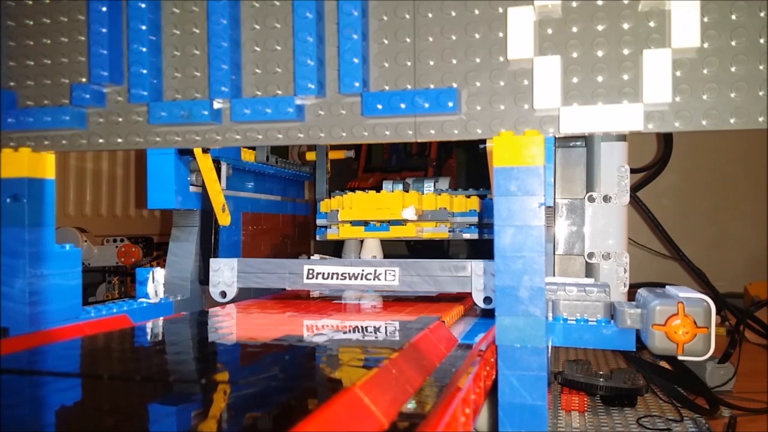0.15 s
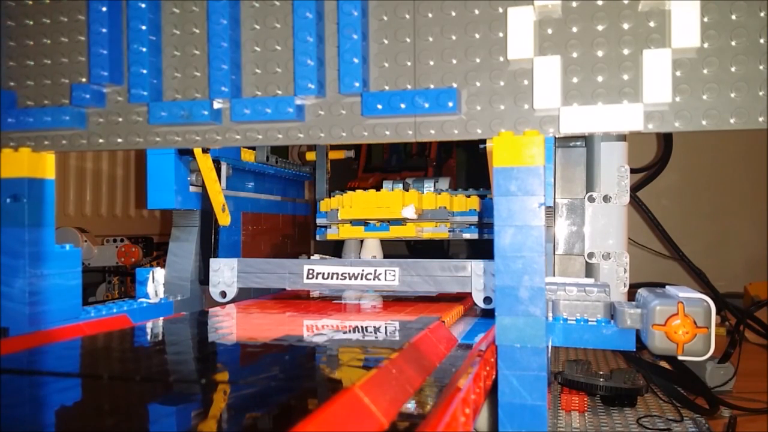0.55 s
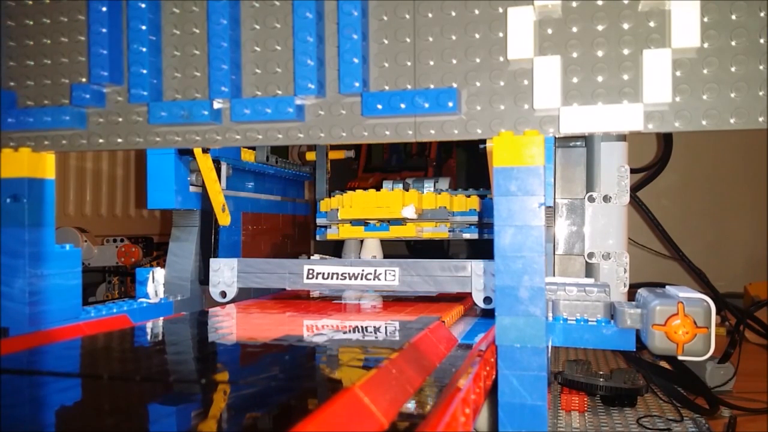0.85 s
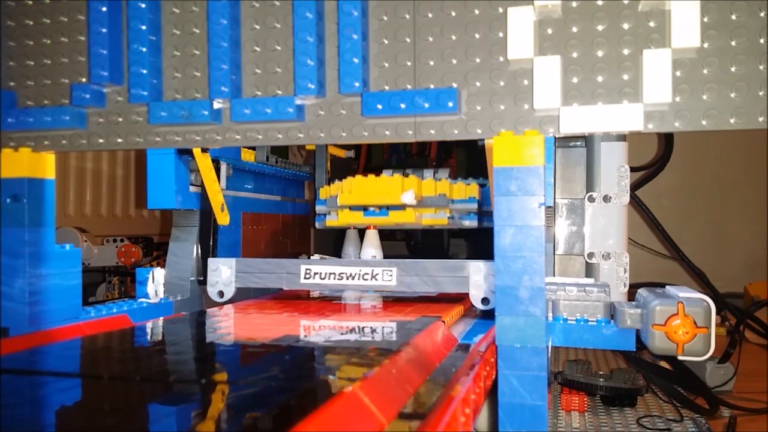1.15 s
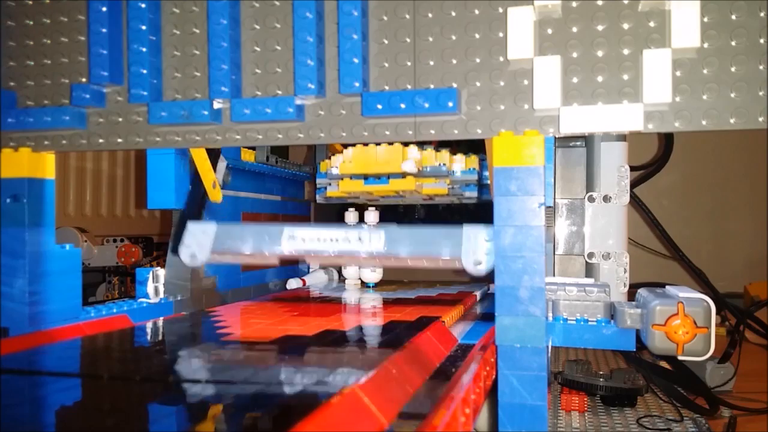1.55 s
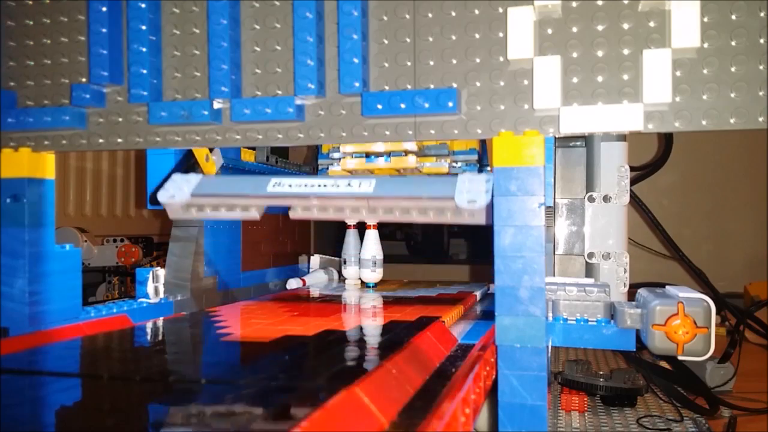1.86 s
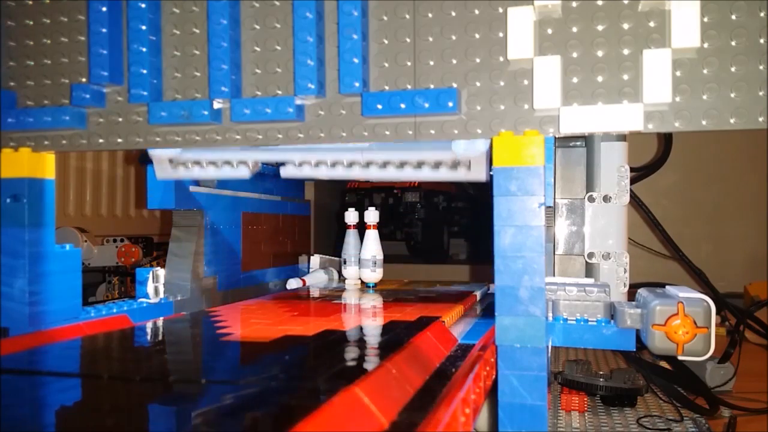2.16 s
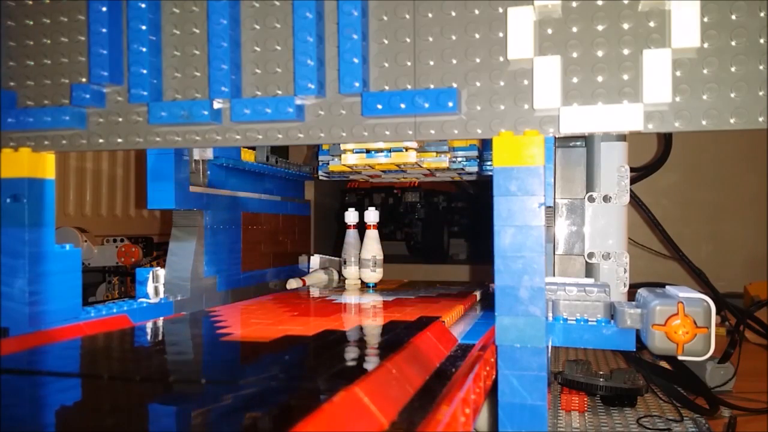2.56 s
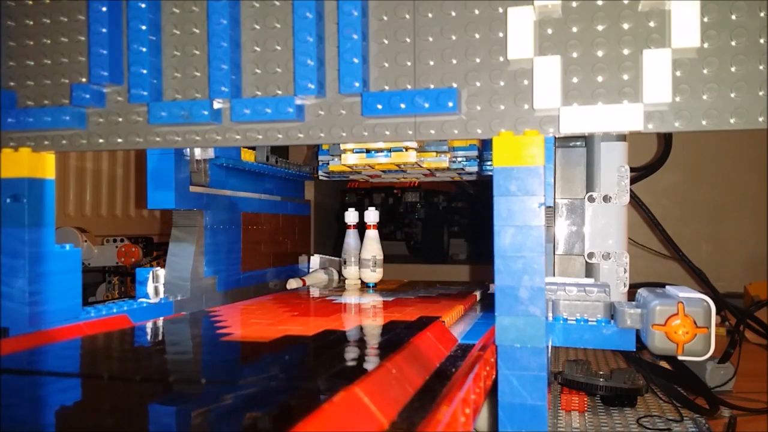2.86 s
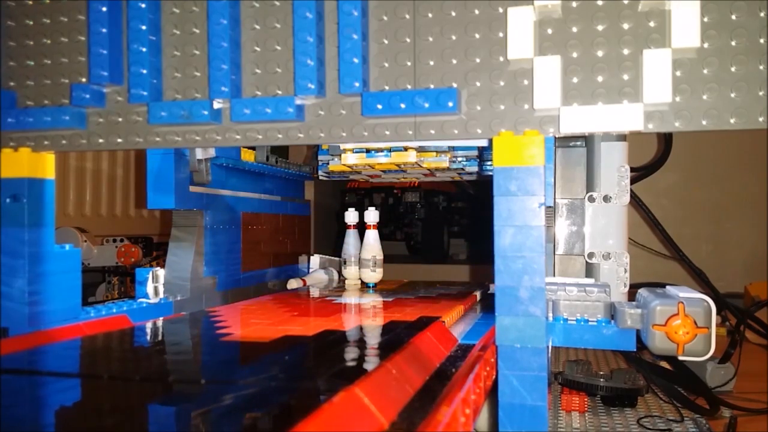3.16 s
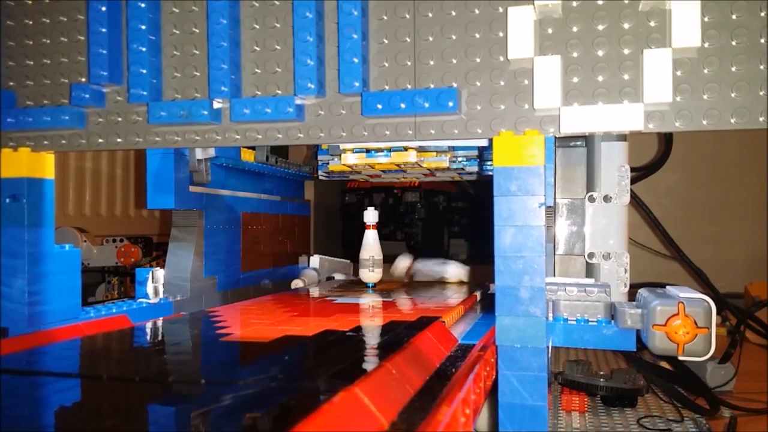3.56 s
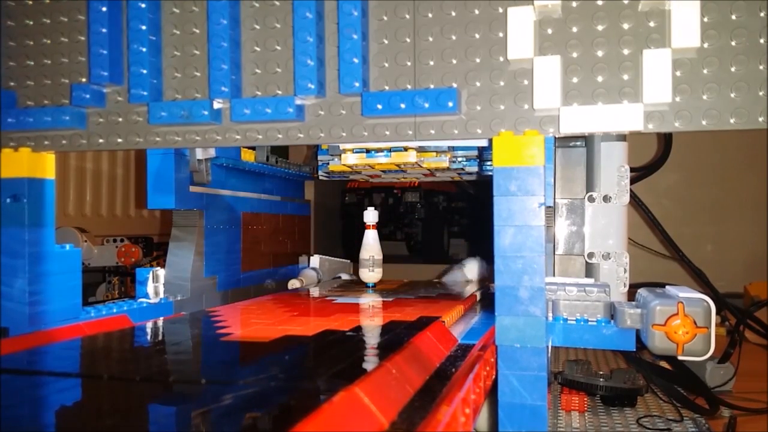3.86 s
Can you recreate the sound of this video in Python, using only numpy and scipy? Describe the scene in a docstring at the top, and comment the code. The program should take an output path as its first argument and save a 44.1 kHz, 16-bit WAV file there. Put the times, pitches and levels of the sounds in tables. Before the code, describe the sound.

In a toy brick bowling alley, a ball clunks and rumbles along a plastic track. A small geared motor whines and stops, then a ball rattles down the lane and scatters plastic pins, heard close in a quiet room.

```python
"""A ball clunks onto the return track of a toy brick bowling alley and rumbles along it, heard from the lane.
A small geared motor whines, lifts the sweep bar and runs down. A ball is launched, hops past on the left,
scatters the pins and drops into the hollow pit. Each blow rings the plastic parts, the frame, the hollow
beneath and the room. Far below: two squeaks at the start, a thin whistle, room hush."""
import sys
import numpy as np
from scipy import signal
from scipy.fft import rfft, irfft
from scipy.io import wavfile

SR = 44100
rng = np.random.default_rng(int(sys.argv[2]) if len(sys.argv) > 2 else 0)


def to_wav(s):
    """Save 16-bit WAV."""
    ch = np.atleast_2d(s).T  # columns
    pcm = np.round(np.clip(ch, -1, 1) * 32767)  # PCM
    wavfile.write(sys.argv[1], SR, pcm.astype(np.int16))


N = 176400
T = np.arange(N) / SR
BIN_HZ = np.fft.rfftfreq(N, 1 / SR)

# Blows, levels relative: start_s, thud_db, clack_db, tick_db, tail_db
TRACK_KNOCKS = [(0.4042, -27, -24, -31.5, -7.5), (0.4169, -28.5, -26, -47, -5),
                (0.4435, -25.5, -29.5, -41.5, -7), (0.482, -33.5, -31.5, -57, -6),
                (0.6694, -28, -35, -51, 0), (0.8753, -31, -35.5, -47, -14.5), (0.9524, -34, -58, -71, -2),
                (1.1819, -22, -61, -47, -4), (1.3042, -29, -29.5, -49, -8.5)]
LANE_HOPS = [(2.9271, -21, -22.5, -28, -3), (2.9796, -38, -32.5, -46, 4), (2.9958, -14.5, -25, -27.5, -7),
             (3.0455, -22.5, -26.5, -45, -0.5), (3.1377, -19.5, -24.5, -32, -11),
             (3.1769, -18.5, -19.5, -32.5, -13.5), (3.2091, -25, -19, -33.5, -14),
             (3.2304, -19, -18.5, -37, -6), (3.2544, -20.5, -22.5, -33.5, -31),
             (3.2786, -21, -21.5, -37, -31), (3.3085, -26.5, -17.5, -29.5, -6.5),
             (3.3283, -37, -20, -36, -28), (3.336, -17.5, -29, -22.5, -29), (3.3639, -16, -30, -21.5, -8.5),
             (3.3882, -24.5, -15.5, -28.5, -18), (3.4131, -18.5, -22.5, -38, -20),
             (3.4348, -28, -23, -31, -1.5), (3.4493, -18, -45, -44, -26), (3.4756, -15.5, -22.5, -31.5, -9),
             (3.5161, -21, -18.5, -25.5, -7)]
PIN_HITS = [(3.539, -21, -25, -23.5, -10), (3.5878, -31, -23, -25, -9), (3.5948, -24, -21, -16.5, -4.5),
            (3.6329, -44, -39, -20.5, -8.5), (3.6646, -37, -29, -23.5, -5), (3.6778, -15, -22.5, -20, -6.5),
            (3.7211, -25, -39, -26, -15), (3.7708, -59, -25.5, -21.5, -7.5), (3.7985, -12.5, -20, -28, -8),
            (3.8866, -36.5, -26, -26, 1), (3.9441, -18, -14.5, -26, -2.5)]
# Where blows land: time_s, left_lead_ms, left_over_right_db, hollow_hz
BLOW_PLACES = [(.4, 0.28, 0, 340), (1.3, 0.12, 1.5, 495), (2.93, 0.31, 1, 609), (3.2, 0.25, 6.5, 608),
               (3.32, 0.33, 2.5, 462), (3.48, .14, 2, 420), (3.65, 0.02, -1, 377), (3.82, -0.22, -1.5, 443)]
# Brick frame modes: pitch_hz, level_db, t60_s
FRAME_MODES = [(403, -3, 0.1), (484, -6, 0.099), (657, -4.5, 0.096), (990, -21, 0.0039), (1830, 4, 0.068),
               (5200, -18, .035)]
# Ringing lengths of track: pitch_hz (at TRACK_MID_S), level_db, loudest_s
TRACK_MODES = [(237, -8.5, 0.68), (309, -2, 0.71), (409.5, -0.5, 0.845), (501.2, 3.5, 0.78), (584, 2, 0.87),
               (655, -2, 0.99), (910, -2, 0.88), (467, 1.5, 1.35)]
# Motor speed: time_s, speed_hz
MOTOR_SPEED = [(1.04, 400), (1.15, 528), (1.22, 554), (1.29, 551), (1.376, 540), (1.562, 574), (1.66, 586),
               (1.77, 586), (1.962, 567), (1.995, 486), (2.06, 468), (2.2, 383)]
# Motor partials: speed_multiple, level_db
WHINE_PARTIALS = [(1, -41.5), (2, -44.5), (3, -40), (4, -43), (5, -45), (6, -49.5), (11, -49.5)]
# Gear fizz balance: freq_hz, left_over_right_db
GEAR_BALANCE = [(300, -0.5), (700, -10), (4400, 0), (7000, 6.5), (9500, -17), (14000, 0)]
# Ball on the lane: time_s, rattle_db, rumble_db
ROLL_LEVELS = [(2.925, -64, -60), (2.95, -27, -39), (3.11, -30, -40.5), (3.24, -32.5, -33),
               (3.37, -27.5, -40), (3.65, -25.5, -52), (3.78, -32, -52.5), (4, -52, -65)]
# Drops into the pit: start_s, hold_s, level_db
PIT_DROPS = [(3.805, 0.054, -20), (3.954, .05, -21)]
# Squeaks: start_s, pitch_hz, level_db
FAINT_SQUEAKS = [(.04, 9400, -63), (.08, 10000, -63)]
# Room decay: freq_hz, t60_s
ROOM_DECAY = [(100, 0.53), (500, 0.33), (2000, 0.52), (6000, 0.37), (15000, 0.35)]
# Left-right likeness: freq_hz, coherence
ROOM_COHERENCE = [(100, 0.73), (500, 0.78), (1200, 0.3), (3000, 0.099)]

# Envelopes, relative: time_s, level_db
RETURN_LEVEL = [(.41, -32), (.6, -29), (.7, -32.5), (.88, -28), (1.0, -31), (1.09, -26), (1.23, -31.5),
                (1.32, -37), (1.47, -76)]
MOTOR_LEVEL = [(1.03, -39), (1.14, -3.5), (1.25, -1), (1.45, -2), (1.7, 0), (1.97, 0.5), (2.04, -3.5),
               (2.12, -14), (2.28, -58)]
SKITTER_LEVEL = [(3.52, -30), (3.57, -31), (3.66, -38), (3.73, -24.5), (3.79, -33), (3.87, -39), (4, -47)]
STIR_LEVEL = [(2.2, -71), (2.49, -62), (2.58, -59), (2.66, -51.5), (2.71, -66), (2.9, -69)]

# Spectral shapes: freq_hz, gain_db
KNOCK_SPECTRUM = [(35, -80), (60, -18.5), (272, -16), (312, -7), (572, 0), (657, -6), (1520, -4),
                  (2530, -17.5), (14100, -41), (15500, -68)]
HOP_SPECTRUM = [(35, -46), (60, -27), (87, -24), (248, -17), (464, -1.5), (533, -0.5), (953, -4),
                (1290, -10.5), (2840, -17), (8090, -31), (9080, -30), (14100, -39), (15500, -48)]
PIN_SPECTRUM = [(35, -45), (60, -54), (266, -9.5), (433, 3), (810, -3), (1020, -5.5), (1150, -10.5),
                (1910, -6), (7720, -18), (8870, -14.5), (11500, -26.5), (14100, -21.5), (15500, -54)]
RETURN_SPECTRUM = [(29, -65), (50, -15), (200, -17), (292, -5.5), (371, -3), (399, -20), (570, -2),
                   (613, -3.5), (941, -3), (1200, -13.5), (1380, -10.5), (1970, -23), (8260, -37.5),
                   (15000, -49)]
GEAR_SPECTRUM = [(120, -6), (400, -12.5), (900, -16), (1500, -3.5), (2000, -12), (2600, -3.5), (4200, -5),
                 (5000, -8.5), (6300, -5.5), (7400, -8), (9700, -3), (10600, -8), (13000, -10),
                 (14500, -33)]
RATTLE_SPECTRUM = [(100, -31), (250, -11), (400, 5), (600, -10.5), (1000, -3), (2000, -15), (4000, -27),
                   (8000, -26.5), (15000, -42)]
RUMBLE_SPECTRUM = [(25, -17), (55, -30), (85, -0.5), (150, -3.5), (230, -7), (400, -18), (1500, -70)]
PIT_SPECTRUM = [(250, -30), (430, 9), (750, 0), (1300, 2.5), (2600, -0.5), (3500, -10), (7000, -11.5),
                (15000, -37)]
HUSH_SPECTRUM = [(20, -7.5), (44, -4), (60, -15), (97, 2.5), (125, -5.5), (220, -11.5), (400, -18),
                 (700, -24), (1080, -18.5), (1600, -22.5), (6000, -27), (9000, -24.5), (15000, -35)]
SKITTER_SPECTRUM = [(200, -23), (450, -36), (2500, 7.5), (5000, 7), (9000, 3), (15000, -1.5)]
STIR_SPECTRUM = [(100, -26), (280, -14.5), (385, 6), (520, -10.5), (1200, -8.5), (3000, -24), (12000, -54)]

THUD_TOP_HZ, TICK_FOOT_HZ = 900, 4500
PART_RANGE_HZ, PART_T60_S, PART_DB = (1745, 10290), 0.038, -26
PUSH_DB, HOLLOW_T60_S = -9, 0.055
TRACK_RISE_PER_S, TRACK_MID_S = 0.16, 0.893
CASE_HZ, CASE_WIDTH_HZ, CASE_DB = 1532, 230, -1.5


def track_knocks():
    """Return track and lifting gear knock."""
    return blows(TRACK_KNOCKS, KNOCK_SPECTRUM, crack_s=0.002, crack_db=-19.5, scatter_s=0.013,
                 scatter_db=-24.5, ring_db=7, hollow_db=-33, swell_s=0.0037, room_db=3.5, gain_db=-1.5)


def ball_hops():
    """The ball bounces down the lane."""
    return blows(LANE_HOPS, HOP_SPECTRUM, crack_s=0.0033, crack_db=-19, scatter_s=0.0049,
                 scatter_db=-16.5, ring_db=5, hollow_db=-32.5, swell_s=0.011, room_db=1, gain_db=-1.1)


def pin_strikes():
    """Ball and pins collide and fall."""
    return blows(PIN_HITS, PIN_SPECTRUM, crack_s=0.0029, crack_db=-11, scatter_s=0.0064,
                 scatter_db=-26, ring_db=8, hollow_db=-36.5, swell_s=0.012, room_db=2, gain_db=-1.03)


def blows(rows, spectrum, crack_s, crack_db, scatter_s, scatter_db, ring_db, hollow_db,
          swell_s, room_db, gain_db, size=24576):
    """Each blow: push, crack, scatter among the bricks; frame, part, hollow and room ring on."""
    t, hz = np.arange(size) / SR, np.fft.rfftfreq(size, 1 / SR)
    low = 1 / (1 + (hz / THUD_TOP_HZ) ** 6)
    high = 1 - 1 / (1 + (hz / TICK_FOOT_HZ) ** 6)
    bands = np.array([low, 1 - low - high, high])
    shape = amp(at_hz(spectrum, hz))
    frame = sum(amp(db - 60 * t / t60_s) * np.sin(2 * np.pi * f * t) for f, db, t60_s in FRAME_MODES)
    frame /= abs(rfft(frame)).max()
    burst = amp(crack_db) * np.exp(-t / crack_s) + amp(scatter_db) * np.exp(-t / scatter_s)
    attack = SR // 100
    place_s, *place_columns = np.transpose(BLOW_PLACES)
    out = np.zeros((2, N))
    for start_s, thud_db, clack_db, tick_db, tail_db in rows:
        lead_ms, side_db, hollow_hz = (np.interp(start_s, place_s, column) for column in place_columns)
        near, far = cohere(noise(size)), cohere(noise(size))
        part_hz = np.exp(rng.uniform(*np.log(PART_RANGE_HZ), (6, 1)))
        part = amp(PART_DB - 60 * t / PART_T60_S) * np.sin(2 * np.pi * part_hz * t).sum(0)
        direct = amp(PUSH_DB) * (t == 0) + near * burst + amp(ring_db) * frame + part
        direct_rms = np.sqrt(np.mean(direct[:, :attack] ** 2))
        tail = room_decay(far) * (1 - np.exp(-t / swell_s)) * amp(tail_db + room_db) * direct_rms
        hollow = amp(hollow_db - 60 * t / HOLLOW_T60_S) * np.sin(2 * np.pi * hollow_hz * t)
        blow = rfft(direct + hollow + tail)
        # Thud, clack and tick set the three bands over the first 10 ms.
        band_attacks = irfft(bands[:, None] * blow * min_phase(shape))[..., :attack]
        band_gains = amp([thud_db, clack_db, tick_db]) / np.sqrt((band_attacks ** 2).mean((1, 2)))
        left, right = irfft(blow * min_phase(shape * (band_gains @ bands))) * pan(side_db)
        lead = round(lead_ms * SR / 1000)
        padding = (max(-lead, 0), max(lead, 0))
        add(out, start_s, np.array([np.pad(left, padding), np.pad(right, padding[::-1])]))
    return amp(gain_db) * out


def ball_return(width_hz=16.2, pass_s=0.17):
    """The ball ticks over brick seams; lengths of track hum in turn, rising as it gathers speed."""
    seams = cohere(grains(per_s=1100, spread_db=0.5, length_s=0.0037), lead_ms=0.18)
    climb = np.exp(TRACK_RISE_PER_S * (T - TRACK_MID_S))
    hum = np.zeros((2, N))
    for hz, db, loudest_s in TRACK_MODES:
        ring = resonate(resonate(seams, hz * climb, width_hz), hz * climb, 4 * width_hz)
        hum += amp(db) * unit_rms(ring) / (1 + ((T - loudest_s) / pass_s) ** 2)
    ticks = colour(seams, RETURN_SPECTRUM)
    return envelope(RETURN_LEVEL) * (amp(-3.5) * ticks + amp(-7.5) * hum) * pan(db=1.3)


def motor(flutter_depth=0.009, power_cut_s=1.97, fade_s=0.025, echo_size=16384):
    """A rough, fluttering geared whine rings in case and room, and dies once the power is cut."""
    speed_hz = np.interp(T, *np.transpose(MOTOR_SPEED))
    turns = np.cumsum(speed_hz * (1 + flutter_depth * wander(hz=80)[0])) / SR
    whine, mesh = np.zeros((2, N)), np.zeros((2, N))
    for multiple, db in WHINE_PARTIALS:
        phase = 2 * np.pi * multiple * (turns + rng.random()) + 0.15 * wander(hz=50)
        whine += amp(db) * np.sqrt(2) * np.cos(phase) * (1 + 0.18 * wander(hz=70))
    for multiple in range(7, 23):
        phase = 2 * np.pi * multiple * turns + 1.9 * wander(hz=24.8)
        mesh += amp(at_hz(GEAR_SPECTRUM, multiple * speed_hz.max())) * np.cos(phase)
    drive = envelope(MOTOR_LEVEL)
    fade = np.exp(-np.maximum(T - power_cut_s, 0) / fade_s)
    # The gearbox case rings as a partial slides through its pitch.
    case_hz = np.full(N, CASE_HZ)
    case = resonate(resonate(whine, case_hz, CASE_WIDTH_HZ), case_hz, 2 * CASE_WIDTH_HZ)
    tones = drive * (fade * (whine + amp(-36) * unit_rms(mesh)) + amp(CASE_DB) * case)
    room_response = unit_rms(room_decay(cohere(noise(echo_size)))) / np.sqrt(echo_size)
    echo = signal.fftconvolve(tones, room_response, axes=1)[:, :N]
    fizz = drive * gear_fizz(speed_hz, turns)
    return (amp(-4) * tones + amp(-5) * echo) * pan(db=-4) + amp(-33) * fizz


def gear_fizz(speed_hz, motor_turns, wheel_top_hz=55):
    """Gear teeth fizz, swelling once per turn of a wheel and of the motor."""
    wheel_turns = np.cumsum(wheel_top_hz * speed_hz / speed_hz.max()) / SR
    swell = (1 + 0.063 * np.cos(2 * np.pi * wheel_turns)) * (1 + 0.15 * np.cos(2 * np.pi * motor_turns))
    teeth = colour(grains(per_s=3300, spread_db=0.5, length_s=0.005) * swell, GEAR_SPECTRUM)
    side_db = at_hz(GEAR_BALANCE, BIN_HZ)
    return unit_rms(irfft(rfft(teeth) * amp(np.array([side_db, -side_db]) / 2), N))


def ball_roll():
    """The ball rattles and rumbles along the lane."""
    ticks = cohere(grains(per_s=150, spread_db=3, length_s=0.0025), lead_ms=0.086)
    rattle = colour(ticks, RATTLE_SPECTRUM) * pan(db=-1)
    rumble = colour(noise(N), RUMBLE_SPECTRUM) * pan(db=9)
    return envelope(ROLL_LEVELS) * rattle + envelope(ROLL_LEVELS, column=2) * rumble


def pin_skitter():
    """Fallen pins skitter."""
    ticks = cohere(grains(per_s=350, spread_db=7, length_s=0.0037))
    return envelope(SKITTER_LEVEL) * colour(ticks, SKITTER_SPECTRUM)


def pit_chatter(rise_s=0.0027, fall_s=0.041):
    """Loose bricks of the pit floor chatter after each drop."""
    swell = np.zeros(N)
    for start_s, hold_s, db in PIT_DROPS:
        age_s = T - start_s
        swell += amp(db) * np.clip(age_s / rise_s, 0, 1) * np.exp(-np.maximum(age_s - hold_s, 0) / fall_s)
    bricks = cohere(grains(per_s=560, spread_db=-1.5, length_s=0.0066))
    return swell * colour(bricks, PIT_SPECTRUM) * pan(db=-1.5)


def quiet_room():
    """Steady hush with a low hum; the frame stirs faintly."""
    hush = amp(-59.5) * colour(cohere(noise(N)), HUSH_SPECTRUM)
    stir = colour(cohere(grains(per_s=360, spread_db=-5, length_s=0.011)), STIR_SPECTRUM)
    return hush + envelope(STIR_LEVEL) * stir


def whistle_and_squeaks(whistle_hz=8064, squeak_s=0.078, sag_hz_per_s=2000):
    """A thin whistle comes and goes; two faint squeaks sag in pitch."""
    out = amp(-84) * np.sqrt(2) * np.sin(2 * np.pi * whistle_hz * T) * np.maximum(0.5 + wander(hz=2.2), 0)
    t = np.arange(0, squeak_s, 1 / SR)
    for start_s, hz, db in FAINT_SQUEAKS:
        phase = 2 * np.pi * np.cumsum(hz - sag_hz_per_s * t) / SR + wander(hz=80)[:, :len(t)]
        add(out, start_s, amp(db) * np.sin(np.pi * t / squeak_s) * np.sin(phase))
    return out


def room_decay(x):
    """Room tail: each band dies at its own rate."""
    hz, time_s, bins = signal.stft(x, SR, nperseg=256)
    decay = amp(-60 * time_s / at_hz(ROOM_DECAY, hz)[:, None])
    return signal.istft(bins * decay, SR, nperseg=256)[1][:, :x.shape[1]]


def cohere(x, lead_ms=0):
    """Makes two channels alike in the bass, as at two close points in a room; left leads."""
    hz = np.fft.rfftfreq(x.shape[1], 1 / SR)
    left, other = rfft(x)
    coherence = at_hz(ROOM_COHERENCE, hz)
    right = coherence * left + np.sqrt(1 - coherence ** 2) * other
    delay = np.exp(-2j * np.pi * hz * lead_ms / 1000)
    return irfft(np.array([left, right * delay]), x.shape[1])


def grains(per_s, spread_db, length_s):
    """Tiny uneven impacts, each a noise puff; rms 1."""
    hits = (rng.random(N) < per_s / SR) * amp(spread_db * np.minimum(rng.exponential(1, N), 3)) ** 2
    power = signal.lfilter([1], [1, -np.exp(-1 / (length_s * SR))], hits)
    return unit_rms(np.sqrt(power) * noise(N))


def resonate(x, hz, width_hz):
    """Unity-gain resonance following the curve hz."""
    carrier = np.exp(2j * np.pi * np.cumsum(hz) / SR)
    pole = np.exp(-np.pi * width_hz / SR)
    return 2 * (carrier * signal.lfilter([1 - pole], [1, -pole], x / carrier)).real


def min_phase(gain):
    """Minimum-phase response with these gains."""
    cepstrum = irfft(np.log(np.maximum(gain, 1e-5)))
    half = len(cepstrum) // 2
    cepstrum[1:half] *= 2
    cepstrum[half + 1:] = 0
    return np.exp(rfft(cepstrum))


def colour(x, spectrum):
    """Spectral shaping, rms 1."""
    return unit_rms(irfft(rfft(x) * amp(at_hz(spectrum, BIN_HZ)), N))


def wander(hz):
    """Random drift per channel, rms 1."""
    return unit_rms(irfft(rfft(noise(N)) * np.exp(-(BIN_HZ / hz) ** 2), N))


def envelope(rows, column=1):
    """Gain from a dB column; silent outside the table, but held if it reaches 3.9 s."""
    rows = np.array(rows)
    after_db = -120 if rows[-1, 0] < 3.9 else rows[-1, column]
    return amp(np.interp(T, rows[:, 0], rows[:, column], left=-120, right=after_db))


def at_hz(rows, hz):
    """Table lookup on a log-frequency axis."""
    freq_hz, value = np.transpose(rows)
    return np.interp(np.log(hz + 1), np.log(freq_hz + 1), value)


def add(mix, start_s, sound):
    """Mixes in a stereo sound."""
    span = mix[:, round(start_s * SR):][:, :sound.shape[1]]
    span += sound[:, :span.shape[1]]


def pan(db):
    """Stereo gains, left over right by db."""
    return unit_rms(amp(np.array([[db], [-db]]) / 2))


def noise(size):
    return rng.standard_normal((2, size))


def unit_rms(x):
    return x / np.sqrt(np.mean(x ** 2) + 1e-20)


def amp(db):
    return 10 ** (np.asarray(db) / 20)


def scene():
    """All sources, stereo."""
    return (track_knocks() + ball_hops() + pin_strikes() + ball_return() + motor() + ball_roll()
            + pin_skitter() + pit_chatter() + quiet_room() + whistle_and_squeaks())


def record(dry):
    """Soft clip near full scale, then low-pass at 15.3 kHz."""
    soft = dry / (1 + dry ** 6) ** (1 / 6)
    lowpass = signal.firwin(151, 15300, window=("kaiser", 8), fs=SR)
    return signal.oaconvolve(soft, lowpass[None], "same", axes=1)


dry = scene()
out = record(dry)
to_wav(out)
```